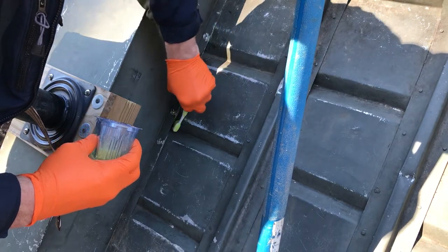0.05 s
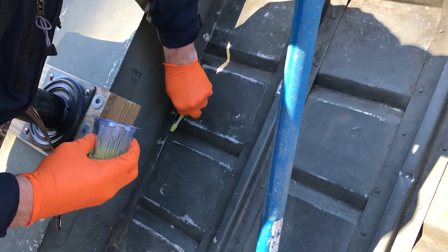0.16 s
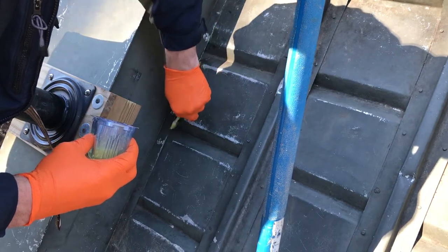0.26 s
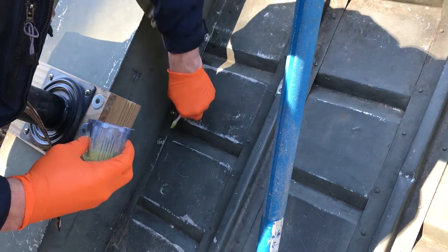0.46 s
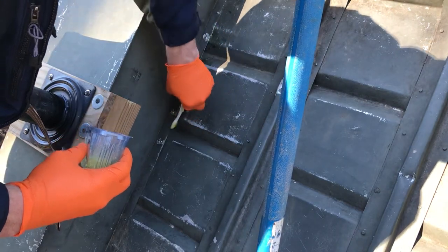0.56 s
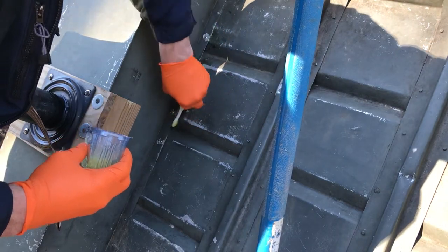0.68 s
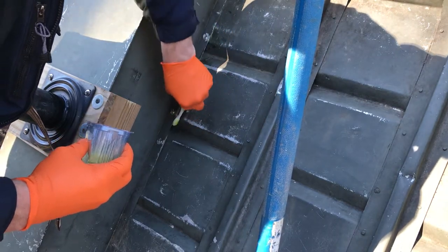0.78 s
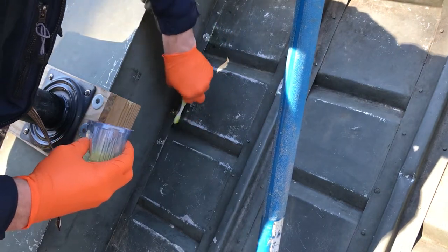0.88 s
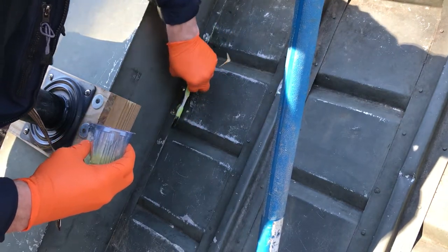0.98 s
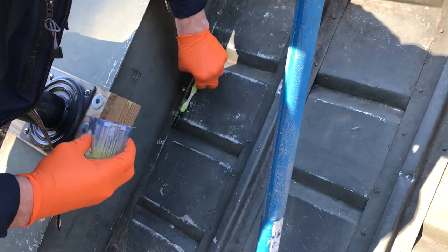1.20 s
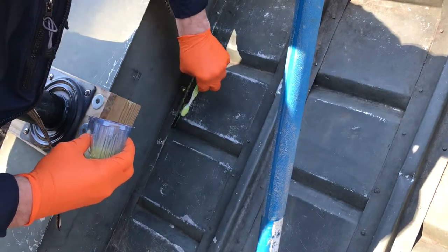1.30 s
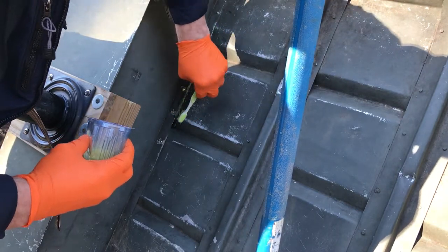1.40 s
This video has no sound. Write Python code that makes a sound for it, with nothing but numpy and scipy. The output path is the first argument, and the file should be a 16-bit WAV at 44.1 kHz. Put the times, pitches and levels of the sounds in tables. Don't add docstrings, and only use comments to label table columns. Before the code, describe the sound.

A stiff brush scrapes sticky epoxy along an aluminium hull seam in short uneven strokes, with low handle thumps, bristle clicks and a faint final squeak, close-miked over quiet outdoor yard hum.

```python
import sys
import numpy as np
from scipy import signal
from scipy.fft import rfft, irfft, next_fast_len
from scipy.io import wavfile
from scipy.ndimage import uniform_filter1d, map_coordinates

SR = 44100
rng = np.random.default_rng(int(sys.argv[2]) if len(sys.argv) > 2 else 0)


def master(y):
    cut = np.clip(np.atleast_2d(y).T, -1, 1)
    pcm = np.round(cut * 32767)
    wavfile.write(sys.argv[1], SR, pcm.astype(np.int16))


def volts_from_db(level):
    exponent = np.asarray(level, float) / 20
    return 10 ** exponent


N = 63945
TIME = np.arange(N) / SR
SLIPS_PER_S, SLIP_SPREAD_DB = 2200, 3


def unit(x):
    return x / np.sqrt(np.mean(x ** 2) + 1e-20)


def along(points, hz):
    f, v = np.transpose(points)
    return np.interp(np.log(hz + 1), np.log(f + 1), v)


def filtered(x, response):
    m = next_fast_len(N + 8192)
    hz = np.fft.rfftfreq(m, 1 / SR)
    return irfft(rfft(x, m) * response(hz), m)[..., :N]


def resonances(table):
    def response(f):
        total = 0
        for k, (centre, width, db) in enumerate(table):
            damping = 1j * f * abs(width)
            total = total + (-1) ** k * volts_from_db(db) * damping / (centre * centre - f * f + damping)
        return total
    return response


def wobble(rate):
    knots = rng.standard_normal(int(N * rate / SR) + 4)
    return map_coordinates(knots, [np.arange(N) * rate / SR])


def swell(peak_s, rise, fall, db):
    t = TIME - peak_s
    return volts_from_db(db - 20 * np.where(t < 0, -t / abs(rise), t / abs(fall)))


def slips(per_s, spread_db, smooth):
    hit, size, sign = rng.random((3, N))
    sizes = volts_from_db(-spread_db * np.log(size + 1e-9))
    kicks = (hit < per_s / SR) * sizes * np.sign(sign - .5)
    return unit(unit(kicks) + smooth * rng.standard_normal(N))


def through(force, gain, response):
    return filtered(force * gain, response) / np.std(filtered(force, response))


# (frequency [Hz], density [dB per Hz])
YARD_SPECTRUM = [(25, -28), (50, -4), (85, 0), (200, -6), (370, -15), (1090, -19), (2200, -31),
                 (15800, -45)]


def yard():
    z = signal.stft(rng.standard_normal(N + 512), nperseg=512)[2]
    field = uniform_filter1d(rng.standard_normal(z.shape), 8, 0)
    field = uniform_filter1d(field, 10, 1)
    bed = signal.istft(z * volts_from_db(1.6 * unit(field)), nperseg=512)[1][:N]
    level_db = -51 + .7 * wobble(4)
    return volts_from_db(level_db) * unit(filtered(bed, lambda f: volts_from_db(along(YARD_SPECTRUM, f))))


# (low edge [Hz], high edge [Hz], level [dB])
SIDE_HISS_BANDS = [(4400, 6000, 3), (6700, 9300, 1), (14300, 15850, -2)]


def spread():
    start_s, end_s = 1.044, 1.083
    u = np.clip((TIME - start_s) / (end_s - start_s), 0, 1)

    def bands(f):
        return sum(volts_from_db(db) * (f > low) * (f < high) for low, high, db in SIDE_HISS_BANDS)
    hiss = filtered(rng.standard_normal(N), bands)
    return volts_from_db(-58.5) * np.sin(np.pi * u) * unit(hiss)


def room(x):
    t = np.arange(SR // 4) / SR
    t60 = 0.084
    tail = rng.standard_normal(len(t)) * volts_from_db(-60 * t / t60) * (t > .003)
    return signal.fftconvolve(x, tail / np.linalg.norm(tail))[:N]


# (time [s], level [dB], lowest mode [Hz], decay t60 [s])
HANDLE_THUDS = [
    (0.234, -34.5, 95, 0.5),
    (0.3021, -23, 104.4, 0.12),
    (0.364, -27, 114, 0.051),
    (.433, -33, 119.7, 0.067),
    (0.679, -31, 106.5, 0.16),
    (0.74, -28, 93, 0.045),
    (0.87, -33.5, 98.3, 0.25),
    (1.174, -31.5, 105, 0.24),
]
# (multiple of the lowest mode [ratio], level [dB])
UPPER_MODES = [(1.7, -3.5), (2.6, -11.5)]


def thuds():
    out = np.zeros(N)
    for start_s, db, hz, t60 in HANDLE_THUDS:
        t = np.maximum(TIME - start_s, 0)
        modes = 0
        for ratio, mode_db in [(1, 0.0086)] + UPPER_MODES:
            modes = modes + volts_from_db(mode_db - 60 * ratio * t / t60) * np.sin(2 * np.pi * ratio * hz * t)
        out -= volts_from_db(db) * modes * (1 - np.exp(-t / 0.0015))
    return out


# (time of peak [s], rise [s per 20 dB], fall [s per 20 dB])
PANEL_PUSHES = [(.1, .06, .1), (.25, .05, .07), (.31, .012, .07), (.436, .04, .06), (.62, .2, .1),
                (.69, .015, .09), (.745, .04, .06), (.79, .03, .06), (.89, .04, .05), (.925, .03, .06),
                (1.06, .1, .1), (1.186, .05, .05)]
PANEL_PUSH_LEVELS = [-59.5, -42, -34.5, -44.5, -71, -41, -42.5, -44.5, -47, -39.5, -38.5, -37]
# (frequency [Hz], width [Hz], level [dB])
PANEL_MODES = [(58.4, 41, -3), (95, 21, -0.5), (114, 41, -8.5), (160.4, 17, -4.5), (186.2, 14, -3),
               (259.3, 28, -6), (369, 84, -15)]


def panel():
    modes = resonances(PANEL_MODES)

    def body(f):
        return modes(f) / (1 + 1j * f / 500) * (1j * f / (45 + 1j * f)) ** 2
    force = slips(400, 1.5, smooth=1.2)
    gain = sum(swell(*push, db) for push, db in zip(PANEL_PUSHES, PANEL_PUSH_LEVELS))
    return through(force, gain, body)


# (time [s], level [dB], centre [Hz], decay t60 [s])
BRISTLE_SNAPS = [(0.064, -52.5, 4120, 0.024), (0.063, -68, 8860, 0.023), (0.1645, -57, 8040, 0.01),
                 (.1955, -55.5, 4300, 0.018), (0.206, -47.5, 3780, 0.016), (0.352, -38, 9700, 0.021),
                 (0.3529, -39.5, 4600, 0.034), (.3525, -50, 6940, .021), (0.374, -47.5, 9000, 0.025),
                 (.3025, -55, 9200, 0.013), (.335, -55, 14500, .02), (0.682, -39, 2700, 0.08),
                 (.661, -64, 10000, .01), (.675, -51, 9500, 0.012), (0.6852, -42, 9800, 0.0076),
                 (.6852, -49, 6600, .01), (0.6858, -44, 13000, .011), (.689, -55, 5500, 0.011),
                 (0.724, -43.5, 5200, 0.019), (0.724, -39, 2530, 0.078), (1.274, -50.5, 7800, 0.034),
                 (1.279, -57, 8200, .015), (1.289, -57, 12800, .03), (1.297, -52, 12000, .015),
                 (1.331, -41, 4500, 0.043), (1.332, -47, 5360, 0.022), (1.333, -52, 8770, 0.023),
                 (1.4345, -61, 9600, 0.016), (1.436, -57, 7000, .016)]


def snaps():
    out = np.zeros(N)
    t = np.arange(SR // 10) / SR
    for start_s, db, hz, t60 in BRISTLE_SNAPS:
        decay = volts_from_db(-60 * t / t60) + 1.3 * volts_from_db(-60 * t / .0025)
        burst = np.zeros(N + SR)
        burst[round(start_s * SR):][:len(t)] = rng.standard_normal(len(t)) * decay
        band = resonances([(hz, .45 * hz, 0)])
        out += volts_from_db(db) * filtered(burst[:N], lambda f: band(f) ** 2)
    return out


# (time of peak [s], rise [s per 20 dB], fall [s per 20 dB], tilt [dB per octave])
BRISTLE_SWEEPS = [(.133, .03, .05, -2), (.198, .02, .05, -4), (.22, .035, .08, -3), (.25, .06, .018, -4),
                  (.3005, .003, .03, -5), (.325, .04, .03, -4), (.4, .05, .3, -1), (.49, .1, .3, 0),
                  (.64, .3, .1, 1), (.687, .008, .045, -2), (.728, .012, .05, -4), (.77, .06, .2, 0),
                  (.92, .11, .06, -3), (.998, .07, .12, 1), (1.06, .07, .13, -2), (1.11, .1, .2, -1),
                  (1.208, .1, .025, -5), (1.305, .012, .015, 0), (1.36, .04, .15, -5)]
BRISTLE_SWEEP_LEVELS = [-64, -60.5, -57, -61.5, -45.5, -60.5, -69.5, -66.5, -80.5, -56.5, -60, -71, -59,
                        -58, -55.5, -65, -60, -64.5, -72]
# (frequency [Hz], width [Hz], level [dB])
COLLAR_MODES = [(2700, 120, -3), (3840, 150, 0), (4410, 150, -4), (5300, 150, -3), (5970, 180, 0),
                (7160, 200, -5), (9300, 300, -8)]


def swish():
    force = slips(5000, 1.4, smooth=1.3) * volts_from_db(1.1 * wobble(120))
    collar = resonances(COLLAR_MODES)
    collar_gain = volts_from_db(8) / 2

    def body(f, tilt_db):
        tilt = volts_from_db(tilt_db * np.log2(f / 4000 + 1e-3))
        hiss = tilt / (1 + (2140 / (f + 1)) ** 4) * (f < 15900)
        firm = tilt_db < -2.5
        return hiss * (1 + firm * collar_gain * np.abs(collar(f)))
    out = np.zeros(N)
    for (peak_s, rise, fall, tilt_db), db in zip(BRISTLE_SWEEPS, BRISTLE_SWEEP_LEVELS):
        out += through(force, swell(peak_s, rise, fall, db), lambda f: body(f, tilt_db))
    return out


# (time of peak [s], rise and fall [s per 20 dB], mode [Hz])
CAUGHT_MODES = [(.235, .05, 950), (.245, .04, 1700), (.303, .015, 600), (.32, .03, 1050), (.327, .03, 1390),
                (.33, .03, 1880), (.336, .04, 705), (.695, .04, 1700), (.695, .04, 640), (.93, .06, 1000),
                (1.038, .035, 2660), (1.04, .03, 1420), (1.062, .04, 1280), (1.068, .05, 4330),
                (1.082, .045, 1500), (1.088, .045, 1270), (1.195, .06, 646), (1.205, .05, 1310)]
CAUGHT_LEVELS = [-55.5, -53.5, -46, -45, -50, -52, -44.5, -50.5, -49, -52, -44.5, -42.5, -42, -51, -38,
                 -48.5, -49, -45.5]


def catches():
    out = np.zeros(N)
    for (peak_s, span, hz), db in zip(CAUGHT_MODES, CAUGHT_LEVELS):
        force = slips(SLIPS_PER_S, SLIP_SPREAD_DB, smooth=1.6)
        out += through(force, swell(peak_s, span, span, db), resonances([(hz, 130, 0)]))
    return out


# (frequency [Hz], level [dB])
SQUEAK_PARTIALS = [(1585, 0), (3600, -17), (4500, -12), (5560, -22)]
# (time of peak [s], rise [s per 20 dB], fall [s per 20 dB], level [dB])
SQUEAK_SWELLS = [
    (1.35, .008, .035, -60),
    (1.38, .035, .045, -59),
    (1.396, .03, .02, -63),
    (1.415, .02, .03, -70),
]


def squeak():
    gain = sum(swell(*stroke) for stroke in SQUEAK_SWELLS)
    wander = .085 * np.cumsum(rng.standard_normal(N))
    tone = np.zeros(N)
    for hz, db in SQUEAK_PARTIALS:
        phase = 2 * np.pi * hz * TIME + wander * np.sqrt(hz / SQUEAK_PARTIALS[0][0])
        tone += volts_from_db(db) * np.sin(phase)
    return gain * unit(tone)


# (time of peak [s], rise [s per 20 dB], fall [s per 20 dB], share of plate ring [0-1])
BRUSH_DRAGS = [(.228, .045, .06, .03), (.252, .06, .04, .03), (.3015, .004, .04, .03),
               (.338, .055, .055, .03), (.43, .05, .12, .05), (.6, .3, .3, .05), (.683, .007, .09, .1),
               (.73, .03, .07, .05), (.78, .04, .1, .05), (.89, .06, .1, .05), (.932, .06, .08, .05),
               (1.05, .06, .08, .15), (1.084, .05, .085, .15), (1.192, .12, .07, .03),
               (1.225, .04, .06, .03), (1.34, .05, .3, .05)]
BRUSH_DRAG_LEVELS = [-53, -52, -44, -46, -59, -60, -44.5, -50.5, -56.5, -51, -49, -39.5, -41.5, -41.5,
                     -55.5, -60.5]
# (frequency [Hz], density [dB per Hz])
SCRAPE_SPECTRUM = [(200, -4.5), (350, -6), (700, -2.5), (1500, -7.5), (2300, -15), (3500, -19.5),
                   (6000, -34.5), (12000, -79)]
# (frequency [Hz], width [Hz], level [dB])
PLATE_MODES = [(650, 80, -6), (745, 50, -7), (1300, 120, 0), (1500, 100, -1), (1700, 120, -10),
               (1920, 100, -9), (2210, 70, -13), (2660, 130, -8), (3310, 200, -18), (4400, 150, -8),
               (5930, 300, -22)]


def drags():
    force = slips(SLIPS_PER_S, SLIP_SPREAD_DB, smooth=1.5) * volts_from_db(0.47 * wobble(60.43))
    dull, ring = np.zeros(N), np.zeros(N)
    for (peak_s, rise, fall, share), db in zip(BRUSH_DRAGS, BRUSH_DRAG_LEVELS):
        stroke = swell(peak_s, rise, fall, db)
        dull += stroke * np.sqrt(1 - share)
        ring += stroke * np.sqrt(share)
    scrape = through(force, dull, lambda f: volts_from_db(along(SCRAPE_SPECTRUM, f)))
    return scrape + through(force, ring, resonances(PLATE_MODES))


def scene():
    near = drags() + squeak() + swish() + snaps() + catches()
    mid = near + volts_from_db(-12) * room(near) + panel() + thuds() + yard()
    side = spread()
    return np.array([mid + side, mid - side])


def band_limit(x):
    return signal.sosfilt(signal.butter(12, 16090, fs=SR, output="sos"), x)


def record(dry):
    def microphone(f):
        return (1j * f / (42 + 1j * f)) ** 2 * (f < 15850)
    heard = filtered(dry, microphone)
    return band_limit(heard)


dry = scene()
out = record(dry)
master(out)
```